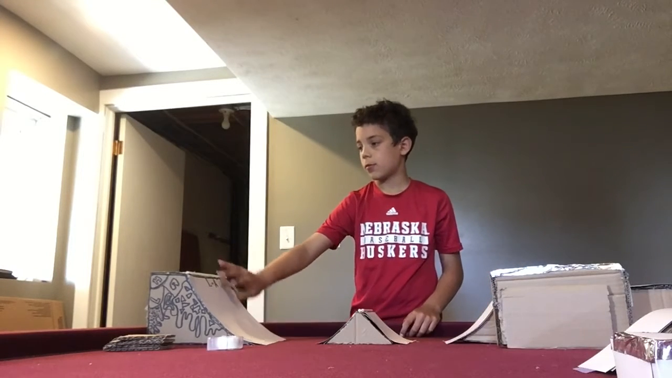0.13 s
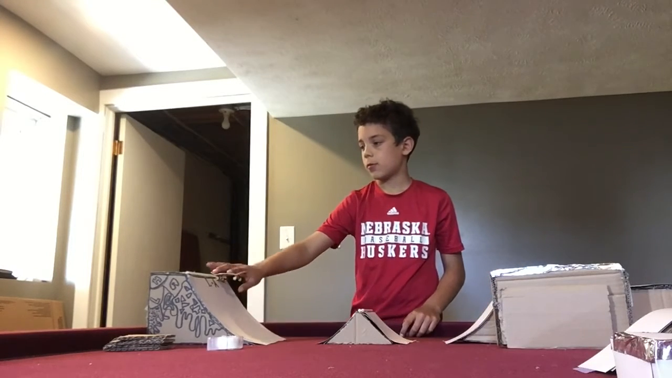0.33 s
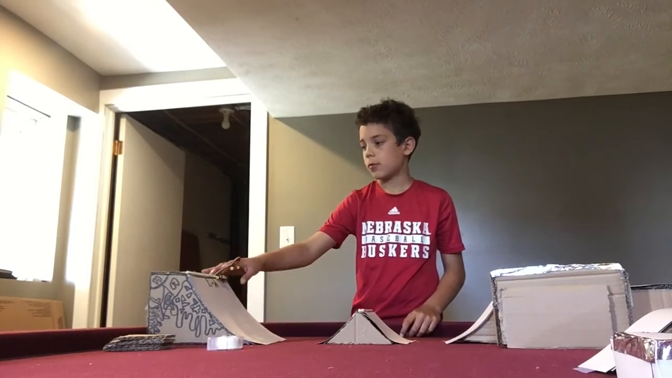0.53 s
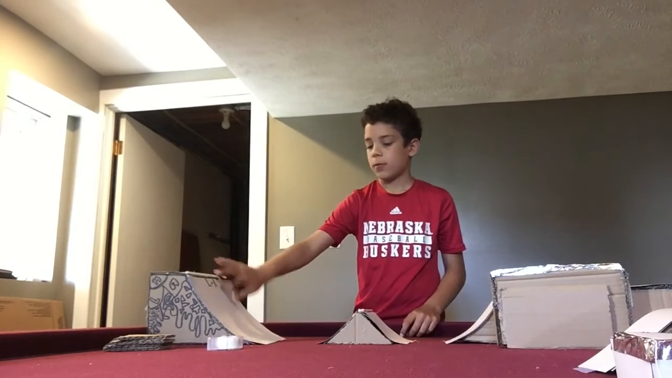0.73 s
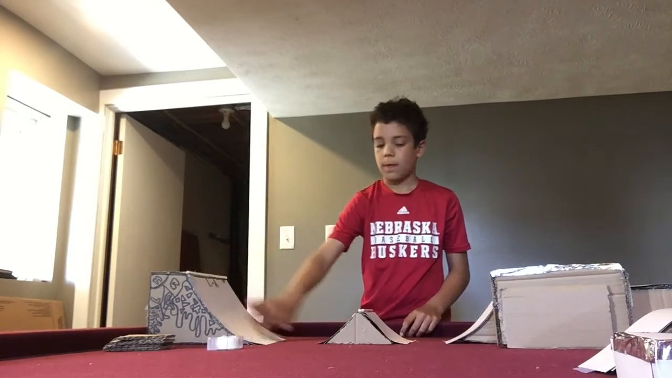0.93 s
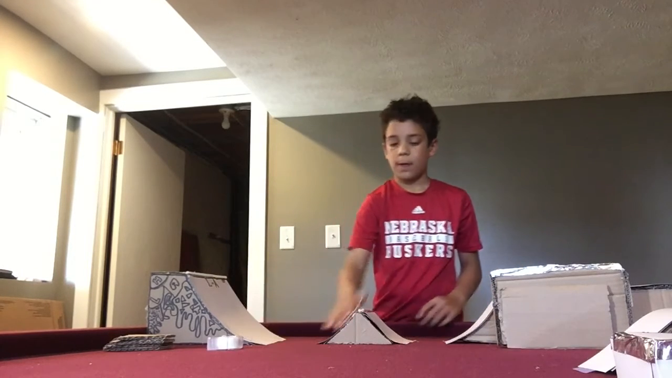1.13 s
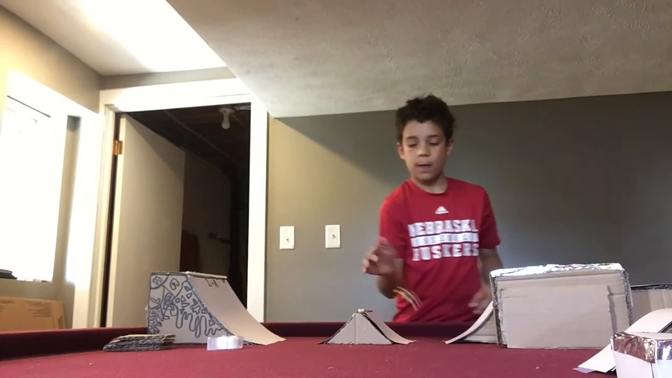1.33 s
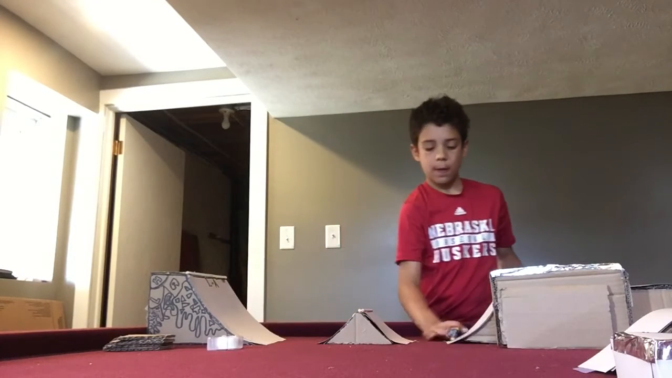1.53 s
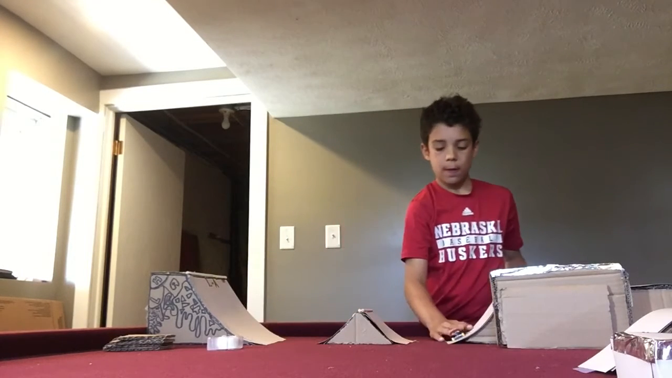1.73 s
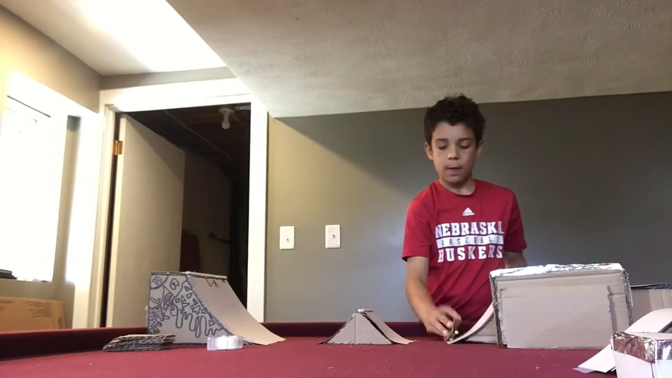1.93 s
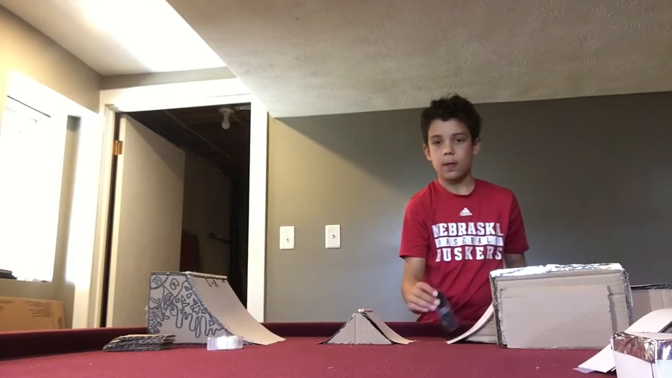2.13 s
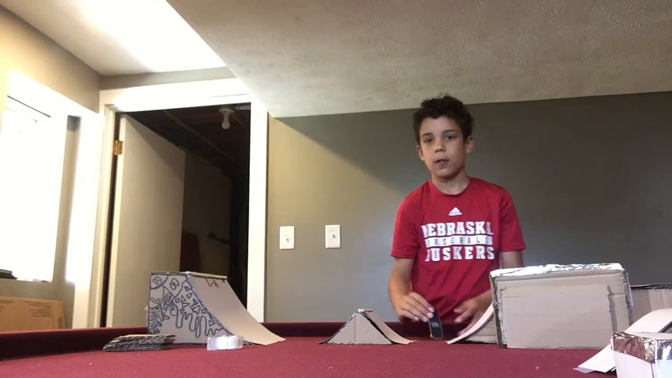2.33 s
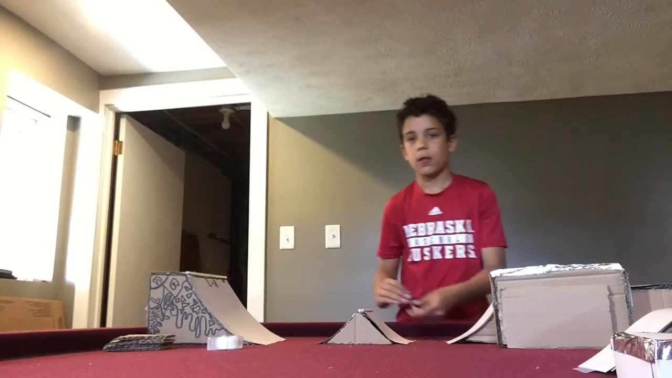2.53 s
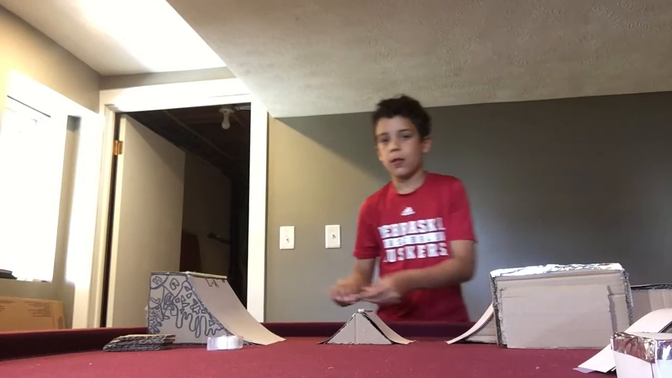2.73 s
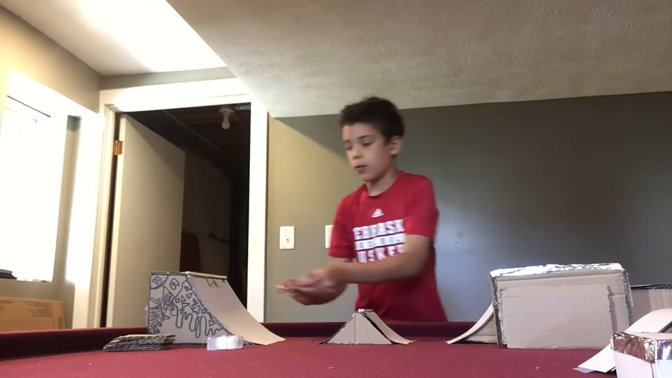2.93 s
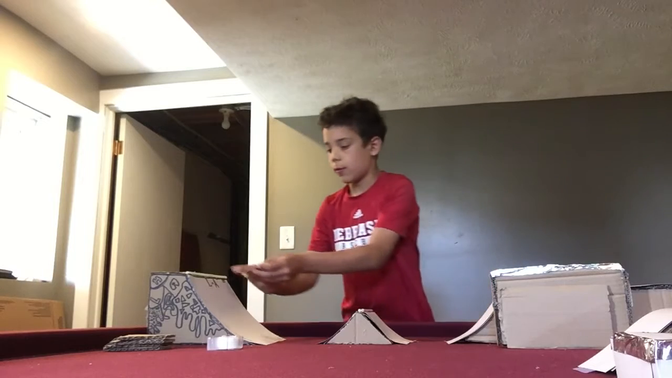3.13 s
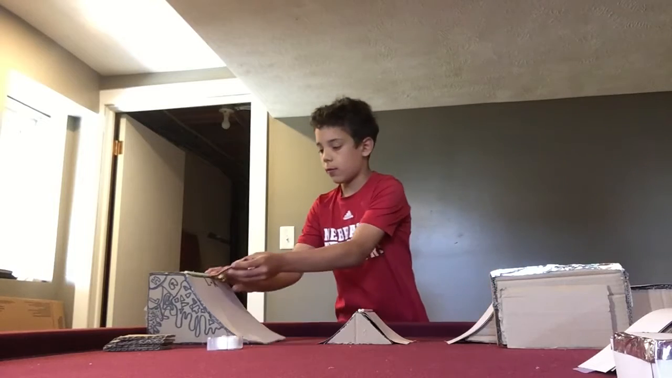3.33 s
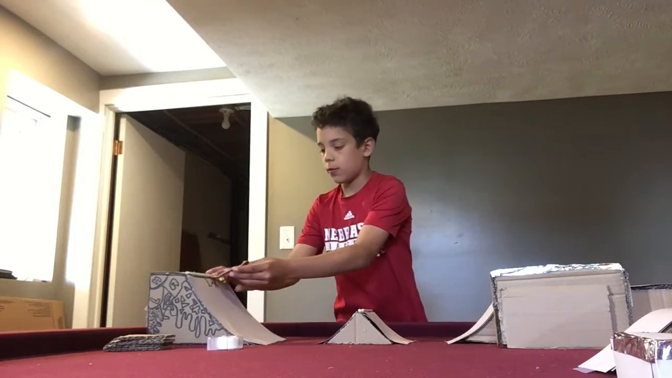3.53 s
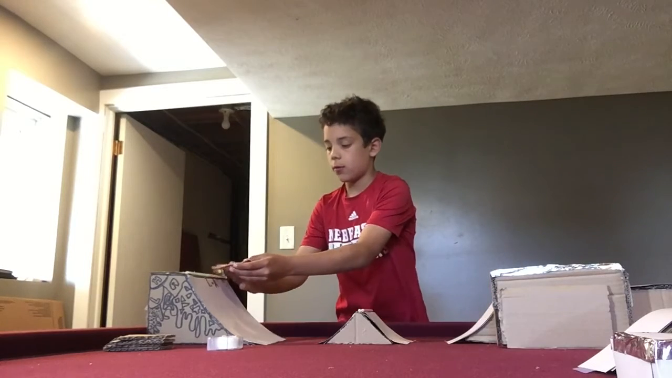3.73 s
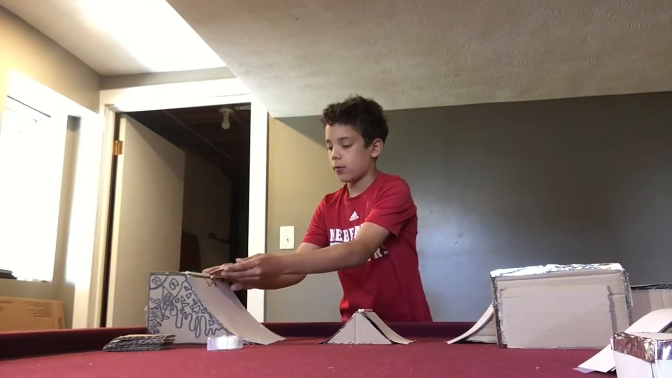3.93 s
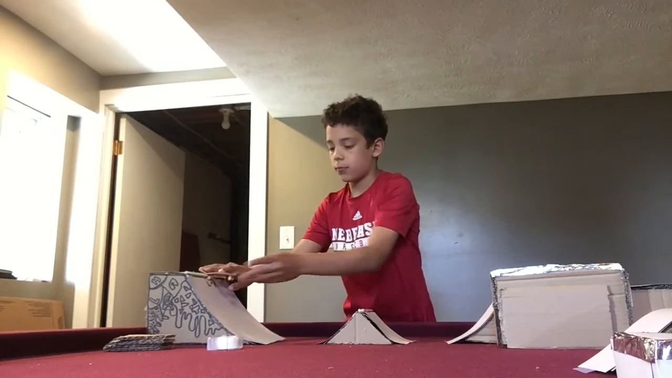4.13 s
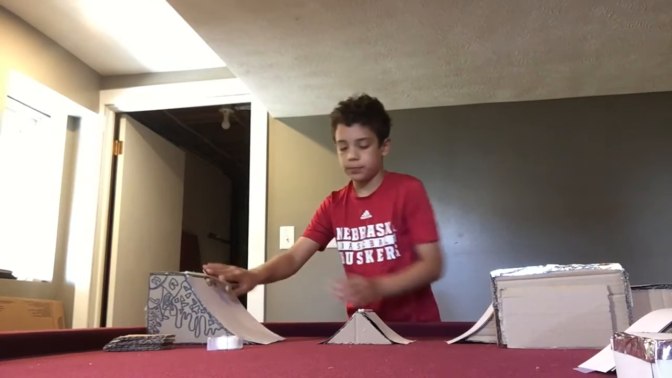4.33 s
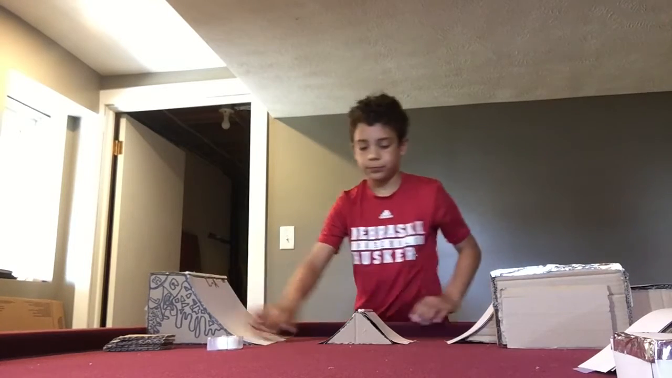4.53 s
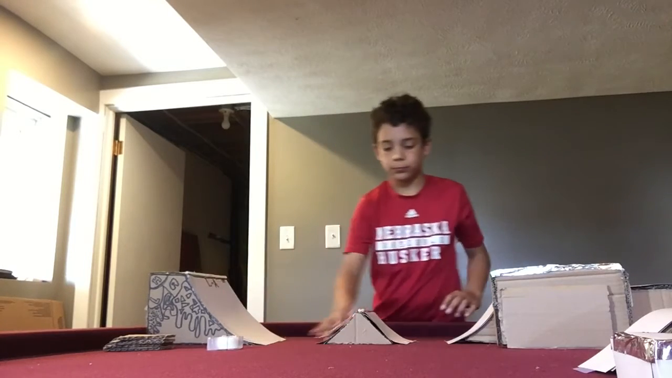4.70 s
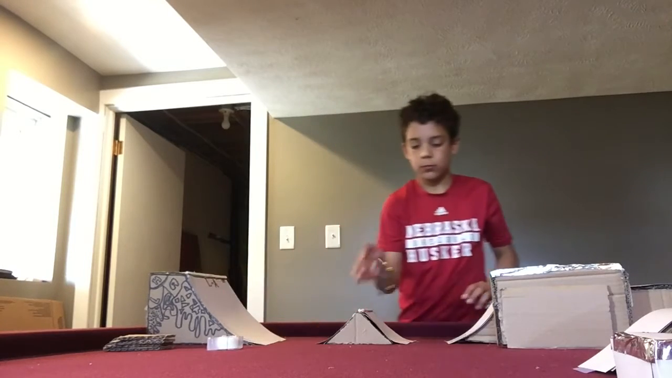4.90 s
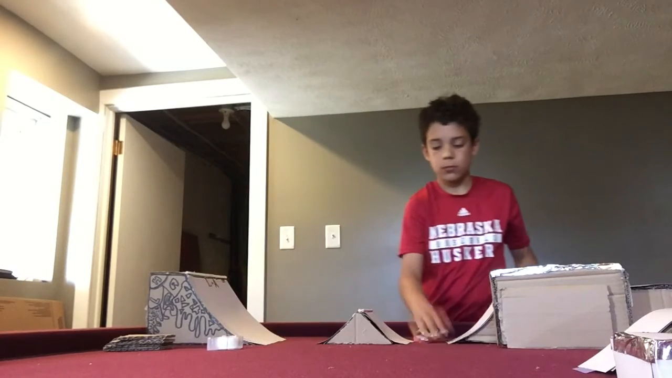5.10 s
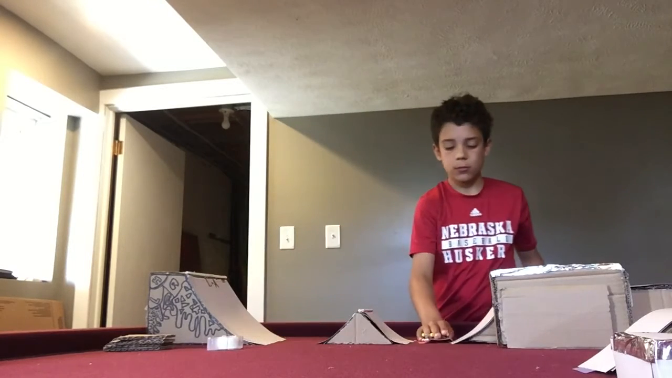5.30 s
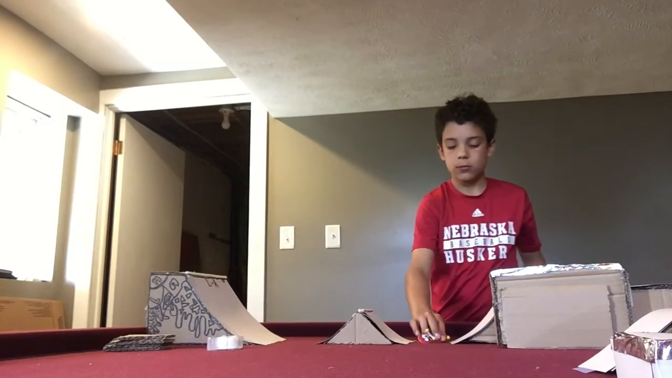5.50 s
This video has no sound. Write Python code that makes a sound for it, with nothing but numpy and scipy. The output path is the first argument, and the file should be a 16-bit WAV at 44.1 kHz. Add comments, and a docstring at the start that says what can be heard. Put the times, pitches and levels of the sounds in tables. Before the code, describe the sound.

Soft steps and a hand brushing card open the scene. Tiny wheels tick and rasp down a card ramp, pop, chatter and slap down with small bounces on a felt-covered table. Dull footfalls and fine rustling fill the middle, with a faint metallic clink. Gentle knocks precede a second roll and a brighter, almost single crack. Indoor sound, quiet background, short room tail, thin deep bass.

```python
"""Fingerboard on cardboard ramps

A fingerboard is ridden over cardboard ramps on a felt-covered table in a small, bare room.
Twice it rolls down, rattles in a jump and lands: ringing modes of deck, axles, card and table, noisy cracks.
Rolling is random bumps on the card's bending modes plus grains of rasp, axle buzz and bearing hiss.
Around the runs, steps ring the floor, and hands and board brush over card and felt as swelling grain noise."""
import sys
import numpy as np
from scipy import signal
from scipy.fft import rfft, irfft, next_fast_len
from scipy.io import wavfile
from scipy.ndimage import uniform_filter1d

SR = 44100
rng = np.random.default_rng(int(sys.argv[2]) if len(sys.argv) > 2 else 0)


def persist_wave(psi):
    """Save psi, clipped to +-1, as 16-bit WAV."""
    counts = np.round(np.clip(psi, -1, 1) * 32767).astype(np.int16)
    wavfile.write(sys.argv[1], SR, np.atleast_2d(counts).T)


N = 245195
TIME = np.arange(N) / SR
AGE = TIME[:SR]  # time axis of one sound, 1 s

# Source levels in the tables are nominal: the layer offsets in the functions add to them.
# low noise of card and floor: hz, relative_db
RUMBLE_SPECTRUM = [(40, -33), (90, -5), (200, 1), (400, -8), (630, 3.5), (950, -7), (1500, -8.5),
                   (3000, -23)]
# board tips over the ramp's lip: time_s, axle_buzz_relative_db
LIP_DROPS = [(0.96, -3), (4.48, -12.5)]
# jumps: take_off_s, landing_s, card_db, card_centre_hz, boom_db, boom_centre_hz, tick_db, crack_db,
# first_bounce_db
JUMPS = [(1.425, 1.5029, -25.5, 308, -27.5, 142, -26.5, -30, -35.5),
         (5.095, 5.113, -23.5, 571, -39.5, 188, -23, -25, -28.5)]
AXLE_RE_TICK_DB = -17.5  # knocks, landings and rattles


def from_db(db):
    """Decibels to gain."""
    return 10 ** (np.asarray(db) / 20)


def rms_one(x):
    """Scale to rms 1."""
    return x / np.sqrt(np.mean(x ** 2) + 1e-20)


def at_hz(points, hz):
    """Read a table on a log-frequency axis."""
    freq, value = np.transpose(points)
    return np.interp(np.log(np.maximum(hz, 1)), np.log(freq), value)


def colour(x, spectrum):
    """Give a signal a spectrum; rms 1."""
    gain = from_db(at_hz(spectrum, np.fft.rfftfreq(len(x), 1 / SR)))
    return rms_one(irfft(rfft(x) * gain, len(x)))


def dying(t60_s):
    """Exponential decay from 1."""
    return np.exp(-np.log(1000) * AGE / t60_s)


def swell(rise_s):
    """A soft contact builds up gradually."""
    return 1 - np.exp(-(AGE / rise_s) ** 2)


def near(hz, centre_hz):
    """The place of contact favours the modes around one pitch."""
    return 1 / (1 + (np.log2(hz / centre_hz) / 0.6) ** 2)


def ring(modes, spread_db, centre_hz=None, detune=0):
    """A blow excites each mode with a strength of its own; the load on the body shifts its pitch a little."""
    hz, db, t60_s = np.transpose(modes)
    gain = from_db(db + spread_db * rng.standard_normal(len(hz)))
    if centre_hz is not None:
        gain = gain * near(hz, centre_hz)
    gain = gain * rng.choice([-1, 1], len(hz)) / np.linalg.norm(gain)
    hz = hz * (1 + detune * rng.standard_normal(len(hz)))
    return sum(g * np.sin(2 * np.pi * f * AGE) * dying(t) for g, f, t in zip(gain, hz, t60_s))


def burst(spectrum, t60_s):
    """Countless heavily damped modes merge into a short noisy crack."""
    return colour(rng.standard_normal(SR), spectrum) * dying(t60_s)


def grains(spectrum, per_s, spread_db, flutter_db):
    """Tiny collisions of uneven size with the surface, coming in clumps; rms 1."""
    size = next_fast_len(N)
    hits = (rng.random(size) < per_s / SR) * rng.choice([-1, 1], size)
    hits = hits * from_db(spread_db * np.minimum(rng.exponential(1, size), 4))
    slow_noise = uniform_filter1d(uniform_filter1d(rng.standard_normal(N), size=300), size=300)
    return rms_one(colour(hits, spectrum)[:N] * from_db(flutter_db * rms_one(slow_noise)))


def add(track, s, sound):
    """Mix a sound in at a time."""
    start = max(int(s * SR), 0)
    track[start:start + len(sound)] += sound[:N - start]


def room(x, wet_db):
    """Diffuse reflections build up within a few milliseconds and die fastest in the treble."""
    # room decay: hz, t60_s
    decay_t60 = [(80, 0.57), (300, 0.5), (1000, 0.54), (3000, 0.4), (6000, 0.42), (12000, 0.28),
                 (16000, 0.24)]
    edges_hz = np.geomspace(40, 18000, 13)
    white = rfft(rng.standard_normal(SR))
    hz = np.fft.rfftfreq(SR, 1 / SR)
    tail = np.zeros(SR)
    for low, high in zip(edges_hz, edges_hz[1:]):
        band = irfft(white * (hz >= low) * (hz < high), SR)
        tail += band * dying(at_hz(decay_t60, np.sqrt(low * high)))
    tail *= swell(rise_s=0.0013)
    return x + from_db(wet_db) * signal.fftconvolve(x, tail / np.linalg.norm(tail))[:N]


def brushing():
    """Each stroke swells, holds and fades; light contact gives a fine hiss, firmer contact a coarser rub."""
    # strokes: full_pressure_s, rise_s, hold_s, hiss_db, rub_db
    strokes = [(0.0, .05, 0.12, -54, -61), (0.278, 0.083, 0.094, -70.5, -73),
               (0.65, 0.0096, 0.011, -65.5, -67), (2.027, 0.07, 0.011, -51.5, -56),
               (2.229, 0.009, 0.0047, -65.5, -65.5), (2.518, 0.073, .01, -69.5, -67.5),
               (2.638, 0.032, 0.059, -66.5, -61.5), (2.83, 0.048, 0.25, -68.5, -73),
               (3.296, 0.23, 0.29, -55.5, -64), (4.04, .08, 0.17, -75.5, -78),
               (4.348, 0.074, 0.1, -61.5, -61.5), (5.508, 0.14, .015, -54.5, -60)]
    # fine hiss: hz, relative_db
    hiss_spectrum = [(3500, -14.5), (6500, -8), (8500, -1.5), (10200, -2.5), (12300, 1.5), (14000, -5),
                     (16000, -16)]
    # coarse rub: hz, relative_db
    rub_spectrum = [(400, 5.5), (1200, -6.5), (2800, -1.5), (4300, 3), (6000, -0.5), (7500, -14.5),
                    (11000, -11)]
    rise_db, fade_db_per_s = 23.5, 168
    fine, coarse = np.zeros(N), np.zeros(N)
    for s, rise_s, hold_s, hiss_db, rub_db in strokes:
        rise = -rise_db * np.maximum(s - TIME, 0) / rise_s
        fade = -fade_db_per_s * np.maximum(TIME - s - hold_s, 0)
        stroke = from_db(np.maximum(rise + fade, -120))
        fine += from_db(hiss_db) * stroke
        coarse += from_db(rub_db) * stroke
    hiss = from_db(-1.5) * fine * grains(hiss_spectrum, per_s=12000, spread_db=0.5, flutter_db=1.0)
    rub = from_db(-2) * coarse * grains(rub_spectrum, per_s=8600, spread_db=2.5, flutter_db=2.6)
    return room(hiss + rub, wet_db=-8)


def footfalls(lead_s):
    """A soft heel touches a moment before it loads the floor, then the toe; boards rattle, the sole scuffs."""
    # steps: loaded_s, thud_db, rattle_db, rattle_centre_hz, scuff_db
    steps = [(0.03, -40.5, -47.5, 554, -75), (0.397, -34, -45.5, 604, -82), (1.238, -36, -54.5, 587, -65),
             (1.296, -42, -57, 600, -76), (2.21, -35.5, -49.5, 750, -73), (2.405, -30.5, -41.5, 460, -53),
             (2.641, -39, -58, 450, -62), (2.685, -44, -55, 432, -61), (2.773, -46, -65, 406, -64),
             (2.816, -39.5, -51.5, 446, -54.5), (2.916, -36, -50, 810, -73), (3.051, -48, -64, 441, -68),
             (5.437, -35.5, -48.5, 441, -54.5)]
    # floor modes: hz, relative_db, t60_s
    floor_modes = [(68.6, -18, 0.096), (98.5, -18.5, 0.11), (135.5, -6.5, 0.073), (199, 0, 0.08),
                   (232.9, -2.5, 0.094)]
    # floorboard modes: hz, relative_db, t60_s
    board_modes = [(356, 11.5, 0.11), (418.4, 4, .14), (468, 0.5, 0.21), (560.6, 1, 0.14), (601, -10, 0.15),
                   (713, 0, 0.14), (782, -3.5, 0.14), (1075, -8, 0.068)]
    # sole on floor: hz, relative_db
    scuff_spectrum = [(500, -17.5), (1300, -1.5), (1800, 3), (2600, -9.5), (4300, -7.5), (8000, -33.5)]
    toe_s, toe_db = 0.037, -7  # after and relative to the heel
    out = np.zeros(N)
    loading = swell(rise_s=0.016)
    for s, thud_db, rattle_db, rattle_hz, scuff_db in steps:
        for delay_s, db in ((0, 0), (toe_s, toe_db)):
            rattle = ring(board_modes, spread_db=2.0, centre_hz=rattle_hz, detune=0.018)
            step = from_db(thud_db + 12.5) * ring(floor_modes, spread_db=2.5, detune=0.014)
            step += from_db(rattle_db + 8.0) * rattle
            step += from_db(rattle_db - 4.0) * burst(RUMBLE_SPECTRUM, t60_s=0.17)
            step += from_db(scuff_db + 2.5) * burst(scuff_spectrum, t60_s=0.11)
            add(out, s - lead_s + delay_s, from_db(db) * step * loading)
    return room(out, wet_db=-11.0)


def blow(tick_db, axle_db, crack_db, card_db, card_hz, boom_db, boom_hz):
    """Wheels tick, axles ring, the wooden deck cracks; card and table answer below. Gives (bright, body)."""
    # wheel tick: hz, relative_db
    tick_spectrum = [(3000, -38), (6500, -13.5), (8000, -9.5), (9400, -5), (10400, -10), (11600, 1),
                     (12500, -1), (13400, -4), (16000, -18.5)]
    # deck crack: hz, relative_db
    crack_spectrum = [(400, -27), (950, 6), (1400, -8.5), (2000, -0.5), (2700, 1.5), (3400, -6),
                      (4200, -5.5), (5400, -1), (6600, -12.5), (9000, -22.5)]
    # ringing modes of each part: hz, relative_db, t60_s
    wheel_modes = [(9500, 7, 0.083), (11020, 14, 0.0076), (11530, -9.5, 0.018), (13100, -11, .02)]
    axle_modes = [(4850, -19, .025), (5280, 4, 0.11), (5460, -4, 0.12), (6030, -3, 0.13)]
    deck_modes = [(1313, -2.5, 0.1), (1444, 4.5, 0.011), (1784, 8.5, 0.0096), (2020, -6, 0.033),
                  (2440, -3, .025), (2716, -12, 0.047), (2940, -2, 0.017), (3820, 1.5, 0.037),
                  (4230, -5, 0.091)]
    card_modes = [(321.6, 3, .08), (367, 2.5, 0.068), (388, 6, 0.084), (438, -1, 0.066), (530, 4.5, 0.037),
                  (581.5, -3, 0.076), (624.4, 1.5, 0.075), (757, -12, 0.049), (796.4, 2, 0.096),
                  (897, -14, 0.06), (1054, -23.5, .04)]
    table_modes = [(61.5, -7.5, 0.34), (85.5, -3.5, 0.41), (99.6, 0, 0.24), (119.5, -1.5, 0.19),
                   (144, -13.5, 0.15), (169.1, -2.5, 0.2), (193.7, 2.5, 0.085), (247.6, -6, 0.33)]
    bright = from_db(tick_db - 6.0) * burst(tick_spectrum, t60_s=0.023)
    bright += from_db(tick_db - 20) * ring(wheel_modes, spread_db=1.5, detune=0.011)
    bright += from_db(axle_db - 7.5) * ring(axle_modes, spread_db=2.5, detune=0.0061)
    bright += from_db(crack_db - 3.0) * burst(crack_spectrum, t60_s=0.038)
    bright += from_db(crack_db - 0.5) * ring(deck_modes, spread_db=1.5, detune=0.03)
    body = from_db(card_db + 0.5) * ring(card_modes, spread_db=1.0, centre_hz=card_hz, detune=0.019)
    body += from_db(card_db - 6.0) * burst(RUMBLE_SPECTRUM, t60_s=0.06)
    boom = ring(table_modes, spread_db=0.5, centre_hz=boom_hz) * swell(rise_s=0.0067)
    body += from_db(boom_db - 1.5) * boom
    return np.array([bright, body])


def knocks(count):
    """The board, pressed down on a ramp, knocks and settles in ever softer touches."""
    # knocks: time_s, card_db, card_centre_hz, boom_db, tick_db
    presses = [(0.7301, -47.5, 663, -52, -46), (0.9666, -40, 369, -66, -46), (1.0036, -38, 450.5, -47, -36),
               (1.093, -42.5, 571, -41, -54), (1.705, -37, 402, -40.5, -42), (3.3183, -45, 373, -45, -41),
               (3.3468, -39.5, 423, -45, -40), (3.6788, -56, 353, -75, -53),
               (3.8933, -46.5, 419.5, -60, -45), (4.335, -47, 450, -78, -46),
               (4.3873, -41.5, 430, -66, -53), (4.4459, -40.5, 435, -59, -59)]
    crack_re_card_db, boom_hz = -14, 149
    settle_s, settle_loss_db = 0.018, 9  # per touch
    for s, card_db, card_hz, boom_db, tick_db in presses:
        axle_db, crack_db = tick_db + AXLE_RE_TICK_DB, card_db + crack_re_card_db
        for k in range(count):
            sound = blow(tick_db, axle_db, crack_db, card_db, card_hz, boom_db, boom_hz)
            yield s + settle_s * k, from_db(-settle_loss_db * k) * sound


def click(tick_db, axle_db, crack_db):
    """A hard, light contact: mostly treble, with a little of the body."""
    card_re_crack_db, card_hz = 0.5, 560
    boom_re_crack_db, boom_hz = -0.5, 192
    card_db, boom_db = crack_db + card_re_crack_db, crack_db + boom_re_crack_db
    return blow(tick_db, axle_db, crack_db, card_db, card_hz, boom_db, boom_hz)


def clicks():
    """Wheels and axles click against the ramp or the deck."""
    # clicks: time_s, tick_db, axle_db, crack_db
    hits = [(0.7766, -31.5, -68, -50.5), (0.7826, -40, -49, -43), (0.8978, -44, -45.5, -54),
            (1.1493, -30.5, -39, -52), (1.4185, -27, -41, -39.5), (1.425, -13, -52, -33.5),
            (1.4586, -23, -34, -43), (1.497, -20.5, -56, -37), (2.814, -58, -72, -55.5),
            (3.4627, -38.5, -62, -64), (4.4235, -38, -52, -48), (4.5324, -45, -38, -45),
            (4.5428, -28.5, -37.5, -41.5), (4.641, -40, -59, -46.5), (4.7114, -39, -61, -45.5),
            (4.8219, -27, -45, -50), (5.0861, -37, -55, -39.5), (5.0902, -24.5, -37, -33),
            (5.1005, -18.5, -56, -33.5)]
    for s, *levels_db in hits:
        yield s, click(*levels_db)


def run_gain(index):
    """One dB column of the runs as a gain, fading quickly outside them."""
    # two runs down the ramp: time_s, rasp_db, card_load_db, bearing_hiss_db
    runs = [
        [(0.8, -64, -47.5, -63), (0.846, -64.5, -55, -58), (0.908, -53, -44.5, -57), (0.93, -58, -51, -59),
         (1.0, -51, -42.5, -51), (1.03, -53.5, -45, -53), (1.078, -46, -47.5, -49.5),
         (1.216, -52.5, -50.5, -43.5), (1.318, -83, -57, -73), (1.39, -72, -64, -88)],
        [(4.47, -62, -57, -60), (4.516, -57, -50, -58), (4.546, -47, -41, -44), (4.596, -51, -53, -47),
         (4.606, -56, -48.5, -52), (4.724, -52.5, -51, -48.5), (4.786, -58.5, -54.5, -63),
         (4.808, -49, -56, -55), (4.824, -55, -61, -41.5), (4.91, -84, -76, -66)],
    ]
    gain = np.zeros(N)
    for rows in map(np.array, runs):
        outside_s = np.maximum(rows[0, 0] - TIME, 0) + np.maximum(TIME - rows[-1, 0], 0)
        level = from_db(np.interp(TIME, rows[:, 0], rows[:, index]))
        gain += level * np.exp(-outside_s / 0.03)
    return gain


def ramp_mode(middle_hz, lip_oct, width_hz, bumps_per_s, spread_db):
    """Bumps over the card's ribs ring a bending mode, stiffer and higher towards the lip, lower beyond."""
    nears_s, leaves_s = 0.18, 0.052  # time constants before and after the lip
    at_lip = np.zeros(N)
    for s, _ in LIP_DROPS:
        at_lip += np.exp(-np.maximum(s - TIME, 0) / nears_s - np.maximum(TIME - s, 0) / leaves_s)
    phase = 2 * np.pi * np.cumsum(middle_hz * 2 ** (lip_oct * at_lip)) / SR
    bumps = (rng.random(N) < bumps_per_s / SR) * rng.choice([-1, 1], N)
    bumps = bumps * from_db(spread_db * rng.standard_normal(N))
    # one-pole resonator in the frame of the gliding pitch
    shifted = bumps * np.exp(-1j * phase) + 1e-18
    ringing = signal.lfilter([1], [1, -np.exp(-np.pi * width_hz / SR)], shifted)
    return rms_one(np.imag(ringing * np.exp(1j * phase)))


def rolling():
    """Wheels bump over the card's ribs, rasp on its fibres, shake their axles and hiss in their bearings."""
    # grain spectra of fibres, axles and bearings: hz, relative_db
    rasp_spectrum = [(700, -1), (1100, -5), (1310, 3.5), (1400, -6), (1530, 5.5), (1720, -5.5),
                     (1880, -0.5), (2150, -9), (2490, -3), (3700, -10), (4600, -2), (5280, -2),
                     (6600, -5.5), (9000, -10)]
    buzz_spectrum = [(3900, -22), (4800, -4.5), (5250, 0.5), (5650, -2.5), (6200, -9.5), (7200, -19)]
    hiss_spectrum = [(4000, -5), (7200, -11), (8600, -3), (10200, -4.5), (11500, -3.5), (12600, -6),
                     (14000, -10.5), (16000, -31)]
    low_mode = ramp_mode(274, lip_oct=0.75, width_hz=77, bumps_per_s=160, spread_db=3.0)
    high_mode = ramp_mode(614, lip_oct=0.35, width_hz=70, bumps_per_s=200, spread_db=4)
    rumble = grains(RUMBLE_SPECTRUM, per_s=890, spread_db=0.0, flutter_db=0.0)
    card = from_db(-7.5) * low_mode + from_db(-7) * high_mode + from_db(-13.5) * rumble
    fibres = grains(rasp_spectrum, per_s=900, spread_db=3.5, flutter_db=2.2)
    bearings = grains(hiss_spectrum, per_s=3000, spread_db=3.5, flutter_db=1.8)
    axles = grains(buzz_spectrum, per_s=250, spread_db=3, flutter_db=2)
    buzz_db = np.interp(TIME, *np.transpose(LIP_DROPS))
    rasp = from_db(-4) * fibres + from_db(buzz_db) * axles
    hiss = from_db(-3) * bearings
    mix = run_gain(index=1) * rasp + run_gain(index=2) * card + run_gain(index=3) * hiss
    return room(mix, wet_db=-5.5)


def rattles(count):
    """Between take-off and landing the loose axles chatter unevenly."""
    spacing_s, tick_db, crack_db, spread_db = 0.011, -29, -43.5, 2
    for take_off_s, landing_s, *_ in JUMPS:
        for k in range(count):
            s = take_off_s + spacing_s * (k + 1 + 0.15 * rng.standard_normal())
            level_db = spread_db * rng.standard_normal()
            if s < landing_s:
                yield s, from_db(level_db) * click(tick_db, tick_db + AXLE_RE_TICK_DB, crack_db)


def landings(count):
    """The deck slaps down, the wheel pairs follow, and the board bounces ever lower and sooner."""
    touch_s, touch_crack_loss_db = 0.006, 3  # per touch; deck and wheel pairs land in turn
    bounce_s, bounce_shrinks, bounce_loss_db = 0.035, 0.7, 3.5  # first gap, gap ratio, loss per bounce
    tick_re_card_db, crack_re_card_db = -14, -10  # in bounces
    bounce_boom_db, bounce_boom_hz = -34, 84  # the table keeps booming under the bounces
    for _, s, card_db, card_hz, boom_db, boom_hz, tick_db, crack_db, bounce_db in JUMPS:
        for k in range(count):
            crack = crack_db - touch_crack_loss_db * k
            axle = tick_db + AXLE_RE_TICK_DB
            yield s + touch_s * k, blow(tick_db, axle, crack, card_db, card_hz, boom_db, boom_hz)
        for k in range(count):
            s += bounce_s * bounce_shrinks ** k
            card = bounce_db - bounce_loss_db * k
            boom = bounce_boom_db - bounce_loss_db * k / 2
            tick, crack = card + tick_re_card_db, card + crack_re_card_db
            yield s, blow(tick, tick + AXLE_RE_TICK_DB, crack, card, card_hz, boom, bounce_boom_hz)


def contacts():
    """All blows of the board; their treble fills the room more than their body."""
    bright, body = np.zeros(N), np.zeros(N)
    for s, (high, low) in [*knocks(count=3), *clicks(), *rattles(count=7), *landings(count=3)]:
        add(bright, s, high)
        add(body, s, low)
    return room(bright, wet_db=-1.0) + room(body, wet_db=-6.5)


def clink(count):
    """A loose wheel taps its axle, ever more softly, as the board is lifted clear of the table."""
    # first tap: time_s, level_db
    first_s, first_db = (2.229, -55)
    # loose wheel modes: hz, relative_db, t60_s
    free_wheel_modes = [(5600, -2, 0.078), (5630, 2, 0.093), (8650, 0, 0.048), (9150, -5, 0.055),
                        (8800, 2, 0.057), (12260, -7, .03)]
    spacing_s, loss_db = 0.012, 1.5  # per tap
    out = np.zeros(N)
    for k in range(count):
        ringing = ring(free_wheel_modes, spread_db=2, detune=0.02)
        add(out, first_s + spacing_s * k, from_db(first_db - loss_db * k) * ringing)
    return room(out, wet_db=-1.5)


def room_noise(level_db):
    """Steady coloured noise: the quiet of the room."""
    # room noise: hz, relative_db
    noise_spectrum = [(15, -38), (25, -9), (70, 6.5), (149, 1.5), (249, 1), (489, -7.5), (607, -9),
                      (988, -15.5), (1260, -12.5), (3430, -20.5), (5570, -21.5), (7510, -22.5),
                      (12200, -22), (14000, -25), (16000, -38.5)]
    return from_db(level_db) * colour(rng.standard_normal(next_fast_len(N)), noise_spectrum)[:N]


def scene():
    """All sources over the quiet noise of the room."""
    people = brushing() + footfalls(lead_s=0.013)
    board = contacts() + rolling() + clink(count=3)
    return (people + board + room_noise(level_db=-65.5))[None]


def record(dry):
    """The microphone loses the deep bass and the top is cut."""
    thin = signal.sosfilt(signal.butter(2, 50, "high", fs=SR, output="sos"), dry)
    return signal.sosfilt(signal.ellip(10, 0.2, 70, 15900, fs=SR, output="sos"), thin)


dry = scene()
out = record(dry)
persist_wave(out)
```